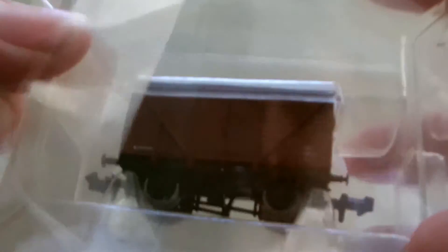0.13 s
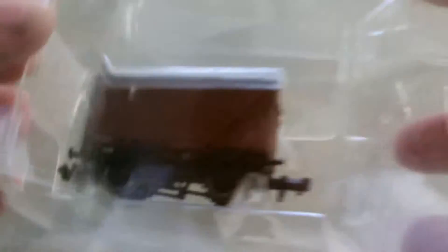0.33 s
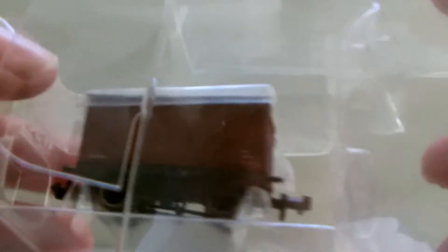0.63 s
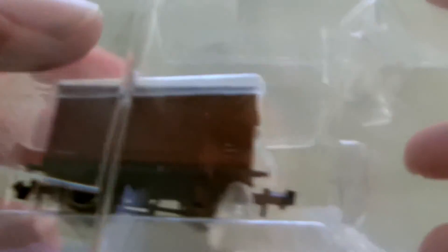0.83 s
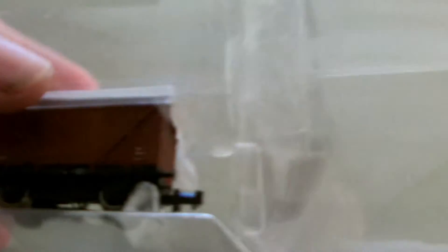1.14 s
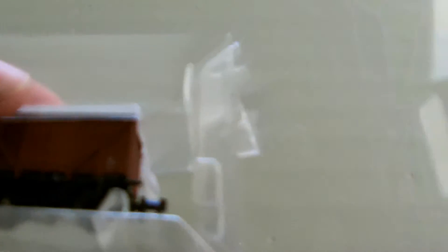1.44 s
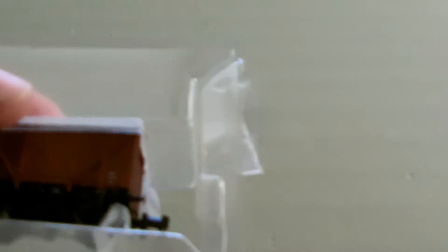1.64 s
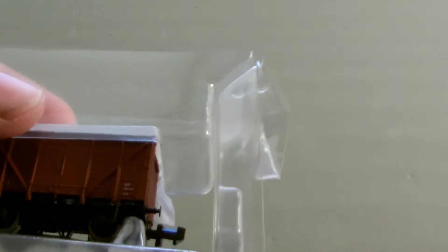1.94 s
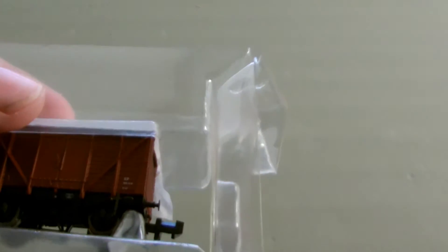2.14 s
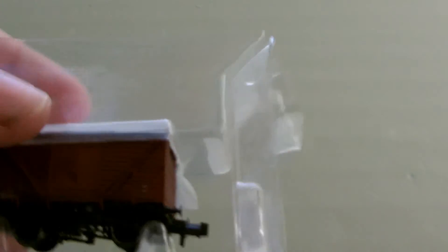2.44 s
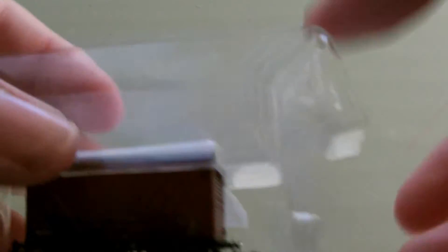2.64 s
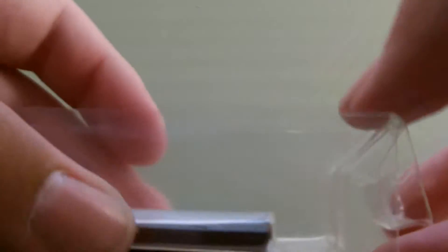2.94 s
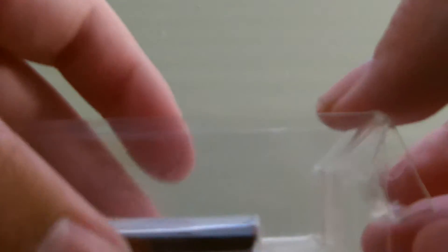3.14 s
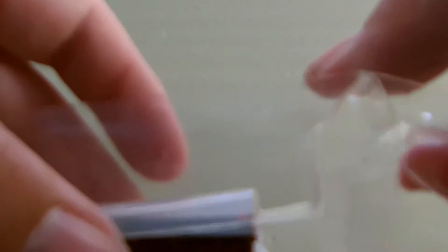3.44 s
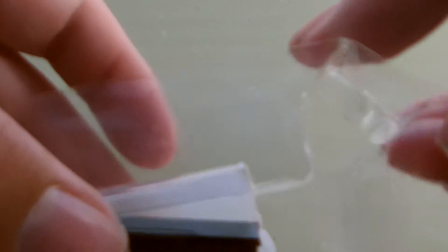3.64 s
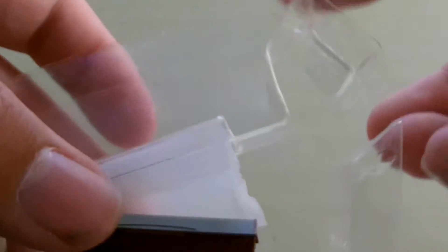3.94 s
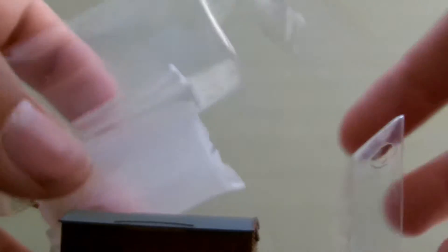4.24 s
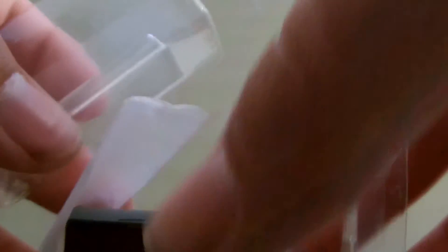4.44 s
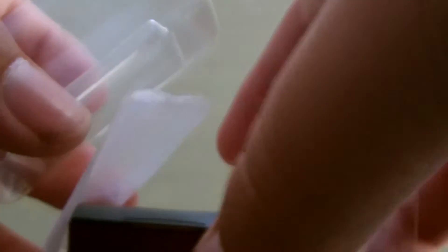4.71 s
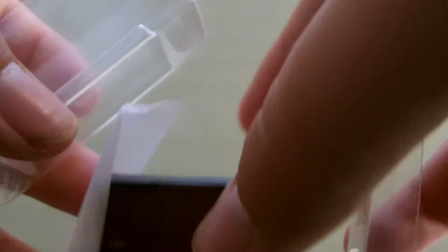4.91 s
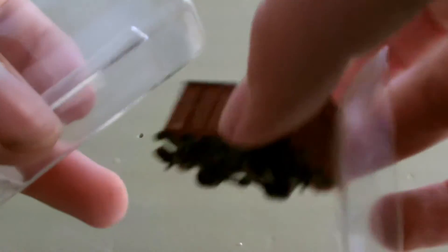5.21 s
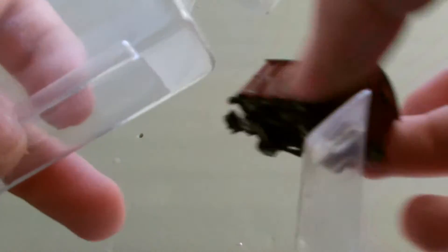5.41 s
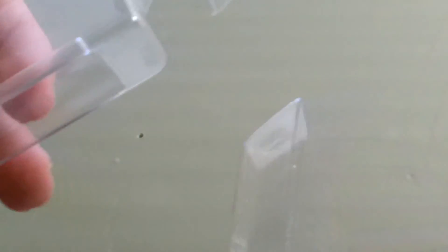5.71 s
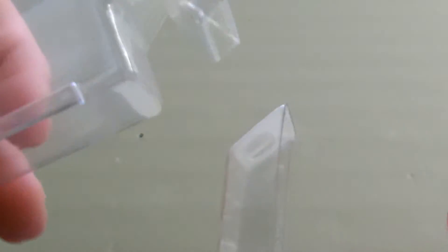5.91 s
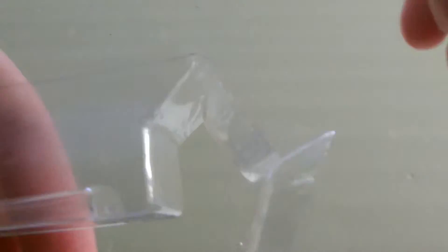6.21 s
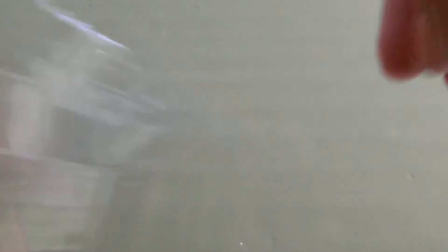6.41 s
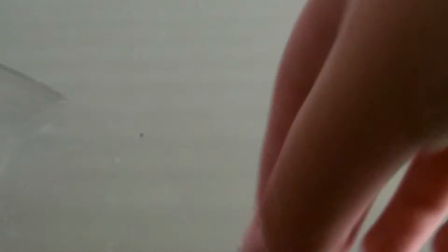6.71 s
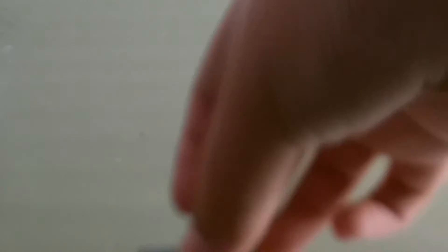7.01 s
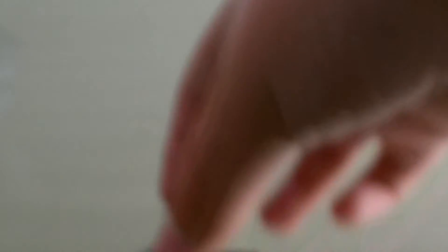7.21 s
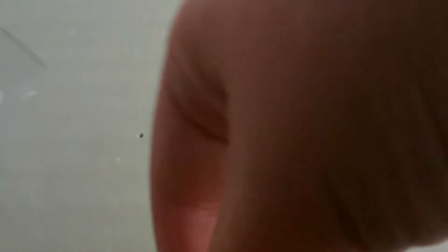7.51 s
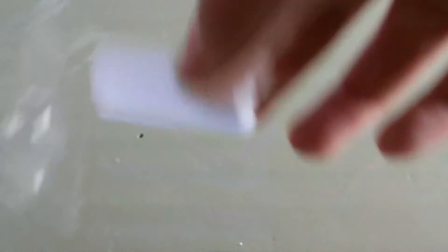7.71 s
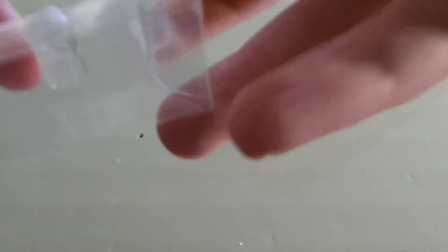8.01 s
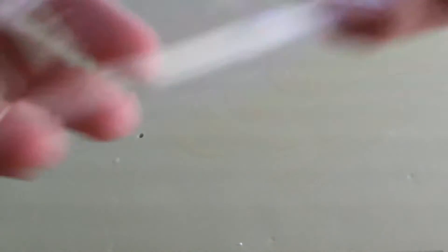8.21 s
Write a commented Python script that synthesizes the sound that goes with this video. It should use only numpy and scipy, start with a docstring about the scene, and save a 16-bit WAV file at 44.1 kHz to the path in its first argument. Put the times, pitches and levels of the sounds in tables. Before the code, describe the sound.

Close-up handling of a stiff plastic shell: sharp crackly snaps, rubbing and soft thuds, a few hard ticks, finally crisp film crackle.

```python
"""A clear plastic blister shell is pulled open by hands in a small quiet room, and a little wagon is lifted out.
The thin shell snaps and buckles as jolts and dying flutters ring its bending modes; domes ping and panels thud.
Its walls squeak in rapid stick-slip releases, and fingers rub over it as grainy, filtered friction.
A tray rattles in its sleeve and the wagon's hard body ticks in decaying modes.
Near the end loose film hisses, crackles and rasps over an edge; a short room tail and faint air lie behind."""
import sys
import numpy as np
from scipy import signal
from scipy.fft import rfft, irfft
from scipy.io import wavfile
from scipy.ndimage import uniform_filter1d

SR = 44100
rng = np.random.default_rng(int(sys.argv[2]) if len(sys.argv) > 2 else 0)


def materialize(psi):
    """Save the field psi as 16-bit PCM at rate SR to the path in sys.argv[1].

    A 1-D psi becomes a single channel; in a 2-D psi each row is a channel.
    """
    bounded = np.clip(np.atleast_2d(psi).T, -1, 1)
    quanta = np.round(bounded * 32767).astype(np.int16)
    wavfile.write(sys.argv[1], SR, quanta)


N = 368235

# rubbing strokes over the shell, levels before the layer trims:
# (time [s], length [s], scrape level [dB], hiss level over the scrape [dB])
RUB_STROKES = [(0, 0.0033, -37, -6), (0.137, 0.073, -50, -6.5), (0.2, 0.051, -66, 6),
               (0.631, 0.081, -58, -17), (0.733, 0.081, -59.5, -10), (0.826, 0.27, -51.5, -9.5),
               (1.757, 0.1, -54.5, 0.5), (1.964, 0.092, -60.5, 3.5), (2.163, 0.077, -66, -9.5),
               (2.762, 0.063, -63, 0), (2.845, 0.14, -67, -2.5), (3.264, .13, -67.5, 1),
               (3.878, 0.053, -66, -15.5), (4.118, 0.049, -64.5, -11), (4.424, 0.04, -63, -27),
               (4.544, 0.11, -60, -8), (5.102, 0.06, -54.5, -4), (5.448, 0.13, -58, -7.5),
               (5.937, 0.061, -51, -6), (6.203, 0.011, -51, -1), (6.229, 0.17, -56.5, 4.5),
               (6.391, 0.11, -58, -4.5), (6.507, 0.23, -65, 1), (6.753, 0.06, -53, -4),
               (7.37, 0.065, -54.5, -1), (7.591, 0.047, -63.5, -0.5), (7.636, 0.07, -66, 12),
               (8.053, 0.33, -71, 10)]
# the tray slides in the sleeve: (time [s], length [s], level [dB], treble shelf [dB])
TRAY_SLIDES = [(0.837, 0.016, -50, -12), (0.892, 0.032, -48, -9.5), (1.003, .034, -45.5, -14.5),
               (1.048, .056, -49, -14.5), (6.232, 0.059, -50.5, -7), (6.308, 0.05, -46, -10),
               (6.371, 0.072, -54, -16.5)]
# tone of the loose film: (frequency [Hz], relative level [dB])
FILM_TONE = [(120, -72), (200, -21.5), (509, -13), (899, -17), (1140, -12.5), (1500, -10.5), (1810, -7.5),
             (2510, -11.5), (4430, -4.5), (9930, 0), (14900, -9.5), (16000, -25)]


def amp(db):
    """Decibels to gain."""
    return 10 ** (np.asarray(db) / 20)


def unit(x):
    """Scales to rms 1."""
    return x / np.sqrt(np.mean(x ** 2) + 1e-20)


def read(points, hz):
    """Reads a spectrum table on a log-frequency axis."""
    f, value = np.transpose(points)
    return np.interp(np.log(hz + 1), np.log(f), value)


def add(mix, s, sound):
    """Mixes a sound in at time s."""
    part = mix[max(round(s * SR), 0):][:len(sound)]
    part += sound[:len(part)]


def colour(x, points):
    """Causal minimum-phase filter with the given spectrum."""
    log_gain = np.log(amp(read(points, abs(np.fft.fftfreq(2048, 1 / SR)))))
    taps = np.fft.ifft(np.exp(np.conj(signal.hilbert(log_gain)))).real
    return signal.oaconvolve(x, taps)[:len(x)]


def treble(x, db, corner_hz=4000):
    """Raises or lowers the treble with a gentle shelf."""
    highs = signal.lfilter(*signal.butter(1, corner_hz, "high", fs=SR), x)
    return x + (amp(db) - 1) * highs


def ring(x, hz, width):
    """One resonance of gain 1, its width in Hz."""
    return signal.lfilter(*signal.iirpeak(hz, hz / width, SR), x)


def glide(x, hz, width_hz):
    """A steep resonance that follows the curve hz: shift down, lowpass twice, shift back up."""
    turn = np.exp(2j * np.pi * np.cumsum(hz) / SR)
    r = np.exp(-np.pi * width_hz / SR)
    once = signal.lfilter([1 - r], [1, -r], x / turn)
    twice = signal.lfilter([1 - r], [1, -r], once)
    return (turn * twice).real


def friction(per_s, spread_db, smooth, chatter_db):
    """Tiny catches of uneven size over a smooth hiss; the contact pressure chatters."""
    size = amp(abs(spread_db) * np.minimum(rng.exponential(1, N), 4))
    catches = size * rng.choice([-1, 1], N) * (rng.random(N) < per_s / SR)
    chatter = unit(uniform_filter1d(uniform_filter1d(rng.standard_normal(N), size=200), size=130))
    return (unit(catches) + smooth * rng.standard_normal(N)) * amp(chatter_db * chatter)


def strokes(rows, attack_s, release_s, arch_db):
    """Gain over time of strokes (s, length s, dB): each takes hold, arches by arch_db and lets go."""
    out, t = np.zeros(N), np.arange(SR // 2) / SR
    for s, length, db in rows:
        arch = np.sin(np.pi * np.minimum(t / length, 1)) - 2 / np.pi
        grip = np.minimum(t / attack_s, 1) * np.exp(-np.maximum(t - length, 0) / release_s)
        add(out, s, amp(db + arch_db * arch) * grip)
    return out


def shell(x, ring_db=0, bend=0):
    """The push itself plus the ringing of the shell's modes, each detuned as the shell is bent."""
    # bending modes: (frequency [Hz], width [Hz], level over the push before ring_db [dB])
    bending_modes = [(384.6, 35, -8.5), (745, 31, 3.5), (1197, 110, -0.5), (1996, 58.3, -16),
                     (3360, 1200, -1.5), (9940, 2600, -1.5)]
    out = x
    for hz, width, db in bending_modes:
        shift = 1 + bend * rng.uniform(-1.6, 1)
        out = out + amp(db + ring_db) * ring(x, hz * shift, width)
    return out


def snaps(rows, flex_s=0.0091, knock_s=0.00182, jolt=1.7, spikes_db=-1.0):
    """Each buckle is a jolt and a dying flutter; the broad panels settle more slowly than the crease."""
    # thump, knock, crack and fizz bands: (low edge [Hz], high edge [Hz])
    bands = [(45, 560), (850, 2500), (2500, 8000), (8000, 13000)]
    # crease resonance looked up from the crack level, a loose map:
    # (crack level over the strength [dB], frequency [Hz])
    crease_map = [(-17, 6900), (-9, 2600), (-5, 8500), (-1.5, 9100), (-9.5, 9900)]
    # a small shell radiates little bass: (frequency [Hz], level [dB])
    radiation = [(90, -9), (150, -1.5), (260, 5), (2100, -2), (2600, -5.5), (3300, -2), (11500, 1),
                 (16000, 6)]
    wall_db, wall_width_hz = 5, 260
    crease_db, crease_width_hz = 7, 900
    fizz_db, fizz_growth = -1, 0.15  # fizz follows the crack and gains on it as it rises [dB per dB]
    out, t = np.zeros(N), np.arange(3072) / SR
    filters = [signal.butter(3, band, "band", fs=SR, output="sos") for band in bands]
    for s, strength, thump, crack, decay, wall_hz in rows:
        fizz = crack * (1 + fizz_growth) + fizz_db
        levels = strength + np.array([thump, 0, crack, fizz])
        crease_hz = np.interp(crack, *np.transpose(crease_map))
        decay = max(decay, 2e-4)
        flutter = unit(rng.choice([-1, 1], len(t)) * amp(spikes_db * rng.standard_normal(len(t))))
        for sos, db, settle in zip(filters, levels, (flex_s, knock_s, 0, 0)):
            push = flutter * np.exp(-t / (decay + settle))
            push[0] = jolt * np.sqrt(1 + settle * SR / 10)
            # the spot that gives way rings at its own two pitches
            wall = amp(wall_db) * ring(push, wall_hz, wall_width_hz)
            crease = amp(crease_db) * ring(push, crease_hz, crease_width_hz)
            body = shell(push, ring_db=1.0, bend=0.068) + wall + crease
            sound = unit(signal.sosfilt(sos, colour(body, radiation)))
            add(out, s, amp(db) * sound * np.sqrt(.01 / t[-1]))  # level as rms over 10 ms
    return out


def crinkles(moves, per_s, level_db):
    """Rows of small snaps as crinkles come loose at random moments of each move, as strong as the move."""
    spread_db, thump_db, crack_db, decay_s = 2, -9, -14, 0.0018
    rows = []
    for start, length, db, _ in moves:
        for when, size, wall in rng.random((rng.poisson(abs(per_s * length)), 3)):
            strength = db + level_db + spread_db * (2 * size - 1)
            wall_hz = np.interp(wall, [0, 1], (778, 2100))
            rows.append((start + when * length, strength, thump_db, crack_db, decay_s, wall_hz))
    return rows


def pops(decay_s=0.00085, rise_s=0.00029, unsteady=0.039):
    """A dome in the shell pops through: a short bright ping, its pitch unsteady while it settles."""
    # pings: (time [s], level before the rise and decay [dB], frequency [Hz])
    dome_pings = [(0.3226, -1, 10730), (0.333, -13, 10480), (5.9781, -13, 6950), (6.0667, -9, 6330),
                  (7.9436, -16.5, 9900)]
    out, t = np.zeros(N), np.arange(1024) / SR
    for s, db, hz in dome_pings:
        wander = unit(uniform_filter1d(rng.standard_normal(len(t)), size=16))
        turns = np.cumsum(hz * (1 + unsteady * wander)) / SR
        envelope = np.exp(-t / decay_s) * (1 - np.exp(-t / rise_s))
        add(out, s, amp(db) * np.sin(2 * np.pi * turns) * envelope)
    return out


def thuds(decay_s=0.0069, rise_s=0.0011, sag=0.13):
    """Fingertips and the tray land softly; the hollow's note sags as the panel relaxes."""
    # soft blows: (time [s], level before the rise and decay [dB], middle of the sagging note [Hz])
    soft_blows = [(.551, -39.5, 460), (.648, -50, 455), (.739, -52, 500), (.944, -36, 308),
                  (1.055, -47, 244), (2.041, -37, 406), (2.963, -49, 725), (3.002, -38.5, 750),
                  (3.603, -55.5, 378), (3.724, -52, 780), (5.982, -29, 340), (6.079, -29, 368),
                  (6.706, -39, 363), (7.354, -38.5, 353)]
    out, t = np.zeros(N), np.arange(4096) / SR
    for s, db, hz in soft_blows:
        fade = np.exp(-t / decay_s)
        turns = np.cumsum(hz * (1 + sag * (fade - .5))) / SR
        add(out, s, amp(db) * np.sin(2 * np.pi * turns) * fade * (1 - np.exp(-t / rise_s)))
    return out


def slips(jitter=0.25, overtone=0.49, low_hz=1000, high_hz=11000):
    """Rapid uneven releases of the sticking wall squeak, with some grit between them."""
    # squeaks: (time [s], length [s], level as rms over that length [dB])
    squeaks = [(0.171, 0.016, -43.5), (0.195, 0.0054, -34), (0.849, 0.0022, -52), (0.875, 0.0082, -39),
               (0.892, 0.0066, -53), (0.919, 0.013, -44.5), (0.94, 0.011, -31.5), (0.961, .002, -47),
               (0.977, 0.0043, -34), (0.987, 0.0014, -35.5), (1.004, 0.0054, -43.5), (1.021, 0.004, -41.5),
               (1.028, 0.0078, -44), (1.048, 0.011, -44.5), (1.072, 0.004, -38.5), (1.092, 0.0033, -45.5),
               (1.1, 0.0034, -45)]
    # louder squeaks slip faster; the rate climbs steeply towards double at double_rate_db
    slip_hz, double_rate_db, rate_power = 1092, -30, 3.8
    out, t = np.zeros(N), np.arange(2048) / SR
    sos = signal.butter(2, [low_hz, high_hz], "band", fs=SR, output="sos")
    for s, length, db in squeaks:
        rate = slip_hz * (1 + amp(db - double_rate_db) ** rate_power)
        wander, noise = rng.standard_normal((2, len(t)))
        turns = np.cumsum(rate * (1 + jitter * unit(uniform_filter1d(wander, size=12)))) / SR
        releases = sum(overtone ** k * np.cos(2 * np.pi * (k + 1) * turns) for k in range(4))
        grit = 2 * noise * np.exp(-2 * (turns % 1))  # dies away after each release
        gate = np.exp(-np.maximum(t - length, 0) / 0.00044) * np.minimum(t / 0.00039, 1)
        sound = sleeve(signal.sosfilt(sos, gate * (releases + grit)))
        add(out, s, amp(db) * sound * np.sqrt(length * SR / np.sum(sound ** 2)))
    return out


def rubs(scrape_db=-2.5, hiss_db=-2):
    """Fingers and plastic drag over the shell: friction rings it, split into a scrape and a hiss."""
    # tones of the two layers: (frequency [Hz], relative level [dB])
    scrape_tone = [(80, -15), (170, 0), (350, 7), (750, 7.5), (1500, 8), (2700, 1), (3600, -4.5),
                   (5500, -17.5), (9000, -29.5)]
    hiss_tone = [(1000, -37), (2200, -20), (4000, 6), (6500, 13), (9000, 8.5), (10700, 6.5), (12500, 6.5),
                 (16000, -8)]
    press = dict(attack_s=0.011, release_s=0.0085, arch_db=1.5)  # hardest in the middle of a stroke
    drive = shell(friction(per_s=1800, spread_db=2.5, smooth=1.0, chatter_db=1.0), ring_db=4.5)
    scrape = strokes([row[:3] for row in RUB_STROKES], **press)
    hiss = strokes([(s, length, db + over) for s, length, db, over in RUB_STROKES], **press)
    low_layer = amp(scrape_db) * scrape * unit(colour(drive, scrape_tone))
    high_layer = amp(hiss_db) * hiss * unit(colour(drive, hiss_tone))
    return low_layer + high_layer


def drag(width_hz=330, upper_ratio=2.2, upper_width_hz=900):
    """A fingertip drags towards a panel's slack middle; its catches excite a sinking note and a mode above."""
    # path of the note: (time [s], frequency [Hz], level of the lower note [dB])
    sinking_note = [(6.235, 1298, -60.5), (6.295, 1100, -59.5), (6.35, 750, -49.5), (6.44, 450, -59.5),
                    (6.5, 380.4, -56.5), (6.55, 328.7, -80)]
    t, (s, hz, db) = np.arange(N) / SR, np.transpose(sinking_note)
    catches = friction(per_s=380, spread_db=2.5, smooth=0.25, chatter_db=2)
    pitch = np.interp(t, s, hz)
    lower = unit(glide(catches, pitch, width_hz))
    upper = unit(glide(catches, pitch * upper_ratio, upper_width_hz))
    gain = amp(np.interp(t, s, db, left=-120, right=-120))
    # the upper mode fades as the pitch sinks
    return uniform_filter1d(gain, size=400) * (lower + pitch / hz.max() * upper)


def film(level_db=-1):
    """The limp film slides over an edge in short pulls and rustles in a dense run of tiny catches."""
    # pulls: (time [s], length [s], level before level_db [dB], treble shelf [dB])
    film_pulls = [(7.734, 0.028, -35.5, 2.5), (7.77, 0.047, -36.5, 3), (7.84, 0.014, -40.5, 0),
                  (7.847, 0.048, -37.5, 3), (7.894, 0.044, -42.5, 2), (7.995, 0.037, -44, -10)]
    grain = colour(friction(per_s=3500, spread_db=1.5, smooth=0.46, chatter_db=0.9), FILM_TONE)
    out = np.zeros(N)
    for s, length, db, bright in film_pulls:
        pull = strokes([(s, length, db)], attack_s=0.0016, release_s=0.0054, arch_db=0)
        out += pull * unit(treble(grain, bright))
    return amp(level_db) * out


def crackles(decay_s=0.00037):
    """Each crease of the film flips in one very short bright burst as it crosses the edge."""
    # bursts: (time [s], peak level [dB])
    crease_flips = [(7.655, -31.5), (7.694, -32.5), (7.738, -28), (7.784, -33), (7.825, -23), (7.8545, -26),
                    (7.8625, -20), (7.864, -26), (7.942, -21), (7.999, -28), (8.113, -36), (8.2058, -35),
                    (8.263, -39)]
    out, t = np.zeros(N), np.arange(512) / SR
    for s, db in crease_flips:
        burst = colour(rng.standard_normal(len(t)) * np.exp(-t / decay_s), FILM_TONE)
        add(out, s, amp(db) * burst / abs(burst).max())
    return out


def rasp(width_hz=450, upper_ratio=1.3, upper_width_hz=1800, upper_db=-4):
    """An edge rasps as the film is drawn away: a broad, grainy scrape whose pitch follows its speed."""
    # path of the scrape: (time [s], frequency [Hz], level of the lower note [dB])
    scrape_path = [(8.06, 2180, -70), (8.16, 2350, -62), (8.25, 2200, -68), (8.31, 2380, -63.5),
                   (8.35, 2150, -59)]
    t, (s, hz, db) = np.arange(N) / SR, np.transpose(scrape_path)
    catches = friction(per_s=260, spread_db=3, smooth=.4, chatter_db=3)
    pitch = np.interp(t, s, hz)
    lower = unit(glide(catches, pitch, width_hz))
    upper = unit(glide(catches, pitch * upper_ratio, upper_width_hz))
    return amp(np.interp(t, s, db, left=-120)) * (lower + amp(upper_db) * upper)


def sleeve(x, push_db=-14, squeeze=.05):
    """The outer sleeve's modes, detuned by the squeeze of the hand, with a little of the push itself."""
    # modes: (frequency before detuning [Hz], width [Hz], level [dB])
    sleeve_modes = [(310, 103.7, -17), (750, 135, 5.5), (1128, 68, 1), (2050, 46, 6.5), (3566, 250, 6.5),
                    (4900, 240, -3), (6220, 390, -4), (7500, 340, -2.5), (9500, 1990, -3),
                    (12200, 600, -9.5)]
    out = amp(push_db) * x
    for hz, width, db in sleeve_modes:
        shift = 1 + squeeze * rng.uniform(-0.68, 1)
        out = out + amp(db) * ring(x, hz * shift, width)
    return out


def slides(attack_s=0.016, release_s=0.0055, arch_db=5.0):
    """Coarse catches of the tray's ribs rattle the sleeve."""
    grain = sleeve(friction(per_s=700, spread_db=3, smooth=.35, chatter_db=1.5))
    out = np.zeros(N)
    for s, length, db, bright in TRAY_SLIDES:
        out += strokes([(s, length, db)], attack_s, release_s, arch_db) * unit(treble(grain, bright))
    return out


def ticks(contact_db=19, skid=0.23, grip_shift=0.026, low_hz=1300, high_hz=8500):
    """The wagon ticks on the tray: contact and skid ring its modes, shifted by the grip of the fingers."""
    # contacts: (time [s], level as rms over 10 ms [dB], treble shelf [dB], scrape decay [s])
    contacts = [(4.8406, -41.5, 29, 0.0025), (5.0542, -49, -18.5, 0.0016), (5.063, -54, -4, 0.0068),
                (5.1283, -39.5, 2.5, 0.0026), (5.1372, -51, -17, 0.00089), (5.144, -53, 0, .003),
                (5.205, -56, -12, 0.0018)]
    # modes of the hard little body: (frequency before the grip [Hz], level [dB], t60 [s])
    wagon_modes = [(1630, -12, 0.023), (1940, 1.5, 0.016), (2310, -10.5, 0.017), (3080, -7, 0.013),
                   (3960, -7.5, 0.013), (4840, -3.5, 0.0095), (5510, -2, 0.0096), (6760, -10.5, 0.0071)]
    out, t = np.zeros(N), np.arange(3072) / SR
    sos = signal.butter(2, [low_hz, high_hz], "band", fs=SR, output="sos")
    for s, db, bright, scrape_s in contacts:
        body = np.zeros(len(t))
        for hz, mode_db, t60 in wagon_modes:
            shift = 1 + grip_shift * rng.uniform(-1.2, 1)
            fade = np.exp(-np.log(1000) * t / t60)
            body += amp(mode_db) * fade * np.sin(2 * np.pi * hz * shift * t)
        body[0] += amp(contact_db)
        push = skid * rng.standard_normal(len(t)) * np.exp(-t / scrape_s)
        push[0] = 1
        struck = signal.fftconvolve(push, body)[:len(t)]
        sound = unit(signal.sosfilt(sos, treble(struck, bright)))
        add(out, s, amp(db) * sound * np.sqrt(.01 / t[-1]))
    return out


def room(x, wet_db=-6, build_s=0.0028, scatter_s=0.0012):
    """A few scattered near reflections and a short diffuse tail that fades at its own rate per band."""
    # decay: (frequency [Hz], t60 [s])
    decay_times = [(150, 0.085), (400, 0.46), (1000, 0.34), (3000, 0.38), (7000, 0.32), (15000, 0.22)]
    # tone of the tail: (frequency [Hz], relative level [dB])
    tail_tone = [(80, -1), (160, 8.5), (300, 0), (1200, -5.5), (3000, -4.5), (8000, -6), (16000, -7.5)]
    # near walls: (delay [s], level [dB])
    reflections = [(.0068, -24), (0.0125, -12.5), (0.0214, -19)]
    t = np.arange(SR // 2) / SR
    hz, times, z = signal.stft(rng.standard_normal(len(t)), SR, nperseg=256)
    z *= amp(-60 * times / read(decay_times, hz)[:, None])
    tail = signal.istft(z, SR, nperseg=256)[1][:len(t)] * (1 - np.exp(-(t / build_s) ** 2))
    response = amp(wet_db) * colour(tail / np.linalg.norm(tail), tail_tone)
    for s, db in reflections:
        scatter = rng.standard_normal(len(t)) * np.exp(-t / scatter_s)
        add(response, s, amp(db) * scatter / np.linalg.norm(scatter))
    return signal.fftconvolve(x, response)[:N]


def air(level_db=-64):
    """The quiet room: noise largely shared in the bass, each microphone's own hiss above it."""
    # tone of the quiet: (frequency [Hz], relative level [dB])
    air_tone = [(25, -13.5), (70, -16), (115, -7), (170, -8), (560, -5.5), (4200, -9), (13000, -10),
                (16000, -13.5)]
    # left-right likeness of the quiet: (frequency [Hz], share [0-1])
    likeness = [(40, 0.76), (120, 1), (300, 0.407), (900, 0.41), (3000, 0.07)]
    hz = np.fft.rfftfreq(N, 1 / SR)
    left, other = rfft(rng.standard_normal((2, N))) * amp(read(air_tone, hz))
    alike = np.clip(read(likeness, hz), -1, 1)
    right = alike * left + np.sqrt(1 - alike ** 2) * other
    return amp(level_db) * unit(irfft(np.array([left, right]), N))


def scene(side_db=0, room_side_db=-1.0, close_db=-3.5):
    """Two close ports hear the same bass, the treble out of step; the closest sounds stir the room less."""
    # snaps and taps: (time [s], strength as rms over 10 ms [dB], panel thump over the strength [dB],
    # crack over the strength [dB], decay before the panel settling [s], ring of the struck wall [Hz])
    shell_snaps = [(.2362, -47, -32, 6, 0.005, 1606), (.2567, -45, -34, -2.5, 0.0015, 1490),
                   (.3075, -36, -26, -16.5, 0.042, 1620), (.3229, -31, -22, 5.5, 0.0016, 2200),
                   (.3339, -27, -28, 4.5, 0.0034, 2200), (.3475, -32.5, -14, -5.5, 0.0032, 2080),
                   (.5271, -37, -18, -8.5, 0.0056, 1220), (.5447, -39, -11.5, -5.5, 0.0045, 1860),
                   (.673, -59, 2, -9.5, 0.0031, 616), (.7615, -61, 3.5, -3.5, .001, 625),
                   (.816, -58, -2, -7.5, 0.0019, 1120), (1.007, -44, -6, -11.5, 0.0017, 1960),
                   (1.056, -43, -8, -10, 0.0014, 800), (1.1, -46, -8, -5, .002, 720),
                   (1.131, -56.5, -20, -2, 0.0022, 1240), (1.1888, -55.5, -23.5, -26, 0.0021, 1237),
                   (1.6105, -53, -16, -13, 0.012, 1650), (1.7491, -36, -10, -1, 0.0071, 1980),
                   (1.7519, -35, -3, -5, 0.0021, 1765), (1.9128, -49.5, -11, -2, 0.025, 1160),
                   (1.9273, -50.5, -8, 0, 0.0042, 1120), (2.0305, -46.5, 8, -4.5, 0.0065, 980),
                   (2.0436, -43, -3, -13, 0.0042, 1220), (2.2009, -59, -13, -3, 0.0095, 1310),
                   (2.7595, -44, -11, -10, 0.0022, 780), (2.7912, -52, 2.5, -3.5, 0.003, 1010),
                   (2.8254, -49, -15, 4.5, 0.0023, 1390), (2.9611, -47, -2.5, -9, 0.002, 730),
                   (3.0, -43.5, -9, -5.5, 0.0014, 1620), (3.0229, -51.5, -2, -13, 0.002, 1850),
                   (3.498, -64.5, -12, 2.5, 0.0012, 2240), (3.582, -63, 4, 8.5, 0.0045, 2410),
                   (3.6497, -56, -4.5, -2.5, 0.0041, 1050), (3.8346, -57, -1, -12.5, 0.0018, 1136),
                   (4.611, -53, -6.5, -13.5, 0.0033, 1850), (4.781, -42, -7.5, -9.5, 0.0014, 1130),
                   (4.8239, -55.5, 0, -3.5, 0.0029, 730), (5.1755, -66.5, -11, 16.5, 0.0011, 1660),
                   (5.186, -49, -3, -10, 0.0018, 1800), (5.2772, -42.5, -3.5, -10, 0.0018, 1860),
                   (5.3948, -51.5, -1.5, -11.5, 0.0011, 1500), (5.6385, -43, 1, -2, 0.0022, 593),
                   (5.6896, -42, -7.5, -7, 0.0026, 1800), (5.9783, -40.5, 4.5, 2, 0.0011, 1215),
                   (5.9849, -37, -2, -6.5, 0.018, 1310), (6.022, -46.5, -19, -6, .003, 1180),
                   (6.0672, -41.5, 8, 9.5, 0.0016, 1370), (6.0798, -42, -10, -1, 0.0055, 1210),
                   (6.1742, -62.5, 7, 10, 0.011, 1820), (6.336, -52, -24, -9, 0.0029, 1491),
                   (6.364, -50, -13, -4, 0.0025, 1400), (6.7029, -50.5, 2.5, -4, 0.0079, 640),
                   (6.9672, -46, -6, -2, 0.0026, 1240), (6.9837, -38.5, -12, -5, 0.0032, 1280),
                   (7.1709, -51, -4, -7.5, 0.011, 1210), (7.354, -44, -2, -11, 0.0014, 1630),
                   (7.365, -47.5, -37, -6, 0.0035, 1440), (7.944, -52, -11, 11.5, 0.0023, 1760),
                   (8.1323, -70.5, 1, 13, 0.00084, 2380), (8.161, -65.5, -12, 14.5, 0.0042, 2420)]
    # difference between the ports: (frequency [Hz], level [dB])
    side_tone = [(40, -10.5), (150, -27.5), (600, -32.5), (1500, -21), (3000, -17.5), (6000, -9),
                 (10000, -3.5), (14000, -1.5)]
    # part of that difference which favours the left: (frequency [Hz], share [0-1])
    left_share = [(1800, 0.049), (4000, 0), (8500, 0.505), (12000, 0)]
    rub_crinkles = crinkles(RUB_STROKES, per_s=15, level_db=-0.5)
    slide_crinkles = crinkles(TRAY_SLIDES, per_s=70, level_db=-4.5)
    shell_sounds = snaps(shell_snaps) + snaps(rub_crinkles + slide_crinkles) + thuds() + rubs() + drag()
    open_sounds = shell_sounds + film() + crackles() + rasp()
    close_sounds = pops() + slips() + slides() + ticks()
    near = open_sounds + close_sounds
    sent = open_sounds + amp(close_db) * close_sounds
    mid = near + room(sent)
    # a second room draw makes the side tail independent of the middle
    across = amp(side_db) * near + amp(room_side_db) * room(sent)
    hz = np.fft.rfftfreq(N, 1 / SR)
    turn = np.exp(-1j * np.arccos(np.clip(read(left_share, hz), -1, 1)))
    side = irfft(rfft(across) * amp(read(side_tone, hz)) * turn, N)
    return np.array([mid + side, mid - side]) + air()


def record(dry):
    """Clips overloads, then limits the band with a steep lowpass."""
    cutoff_hz = 16100
    lowpass = signal.firwin(255, cutoff_hz, window=("kaiser", 9), fs=SR)
    return signal.oaconvolve(np.clip(dry, -.92, .92), lowpass[None], "same")


dry = scene()
out = record(dry)
materialize(out)
```